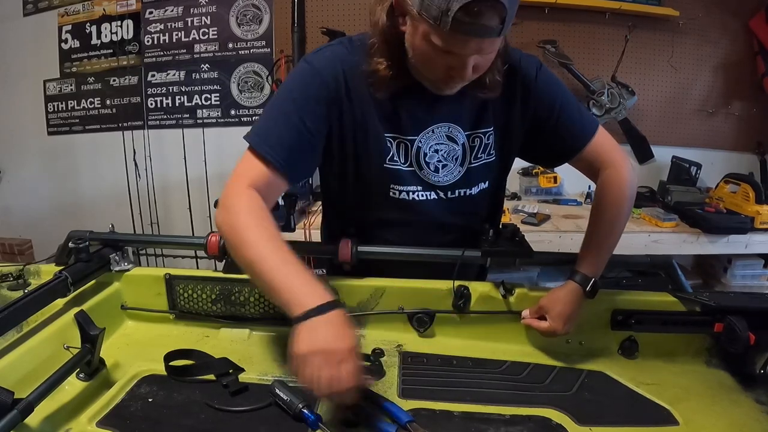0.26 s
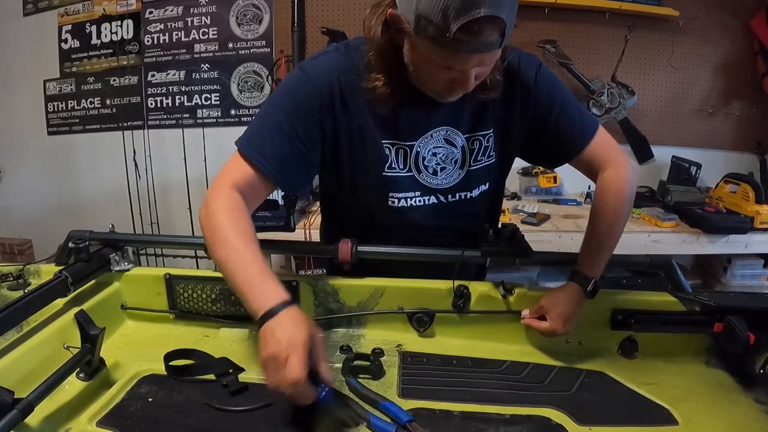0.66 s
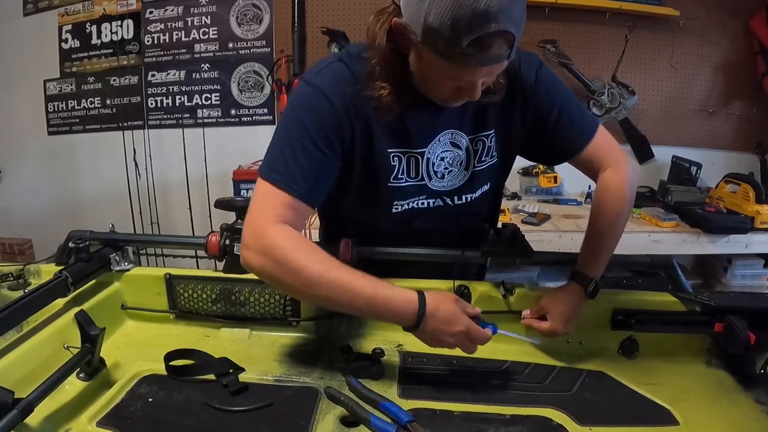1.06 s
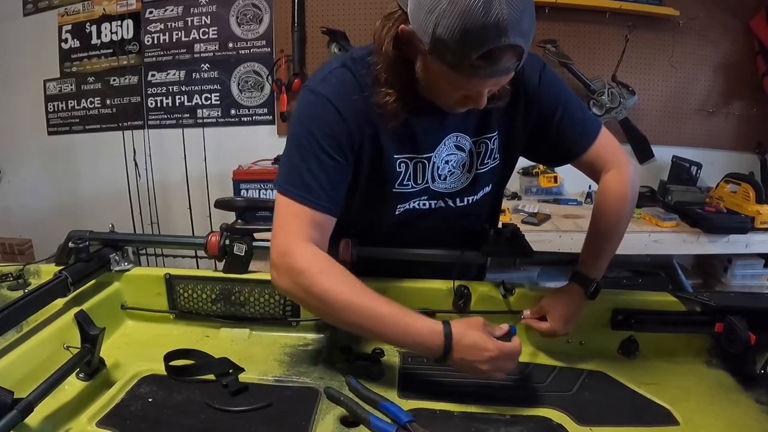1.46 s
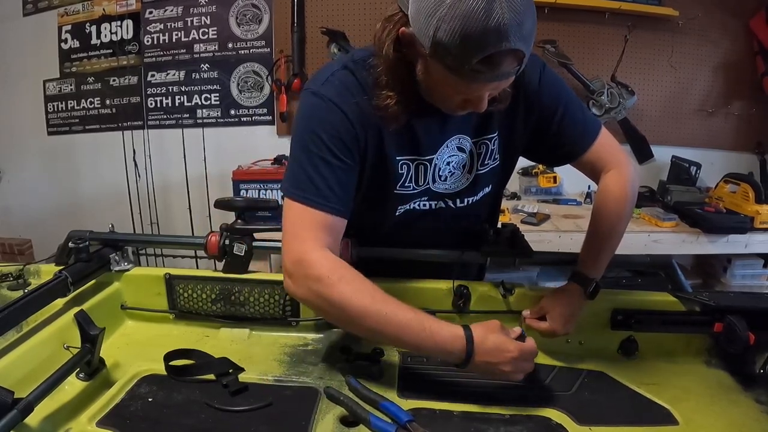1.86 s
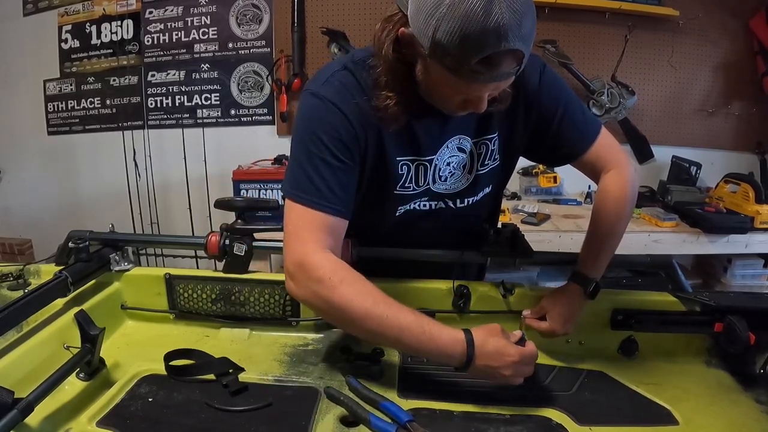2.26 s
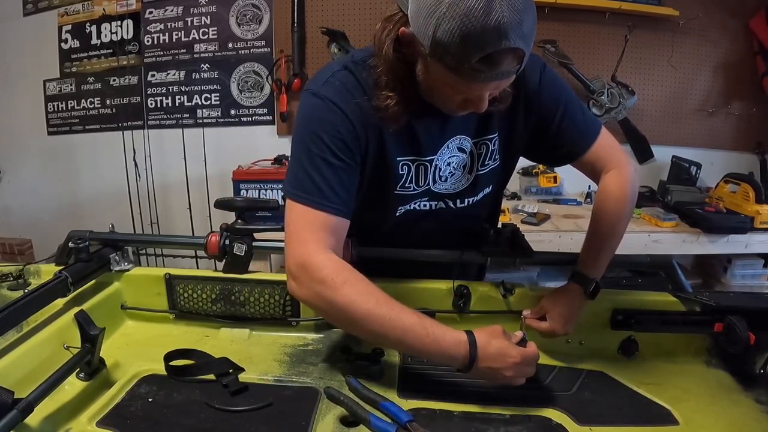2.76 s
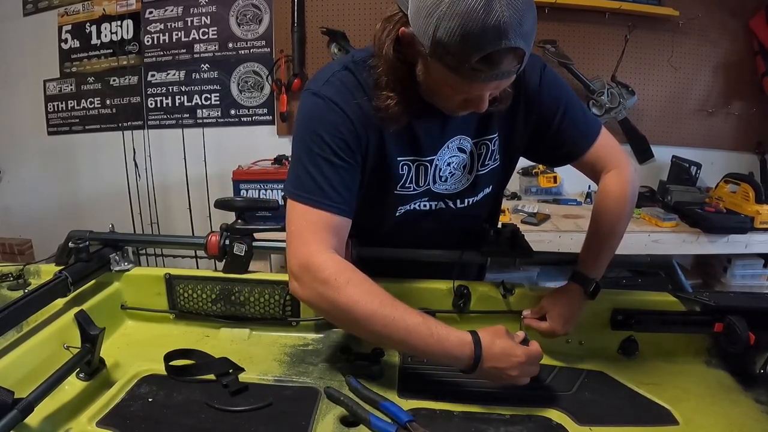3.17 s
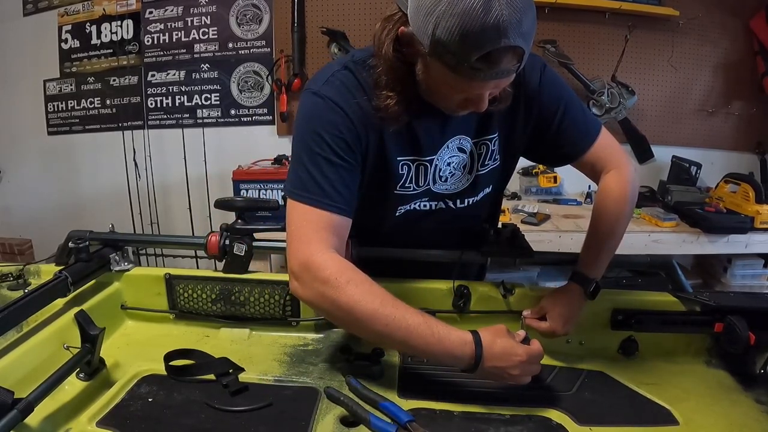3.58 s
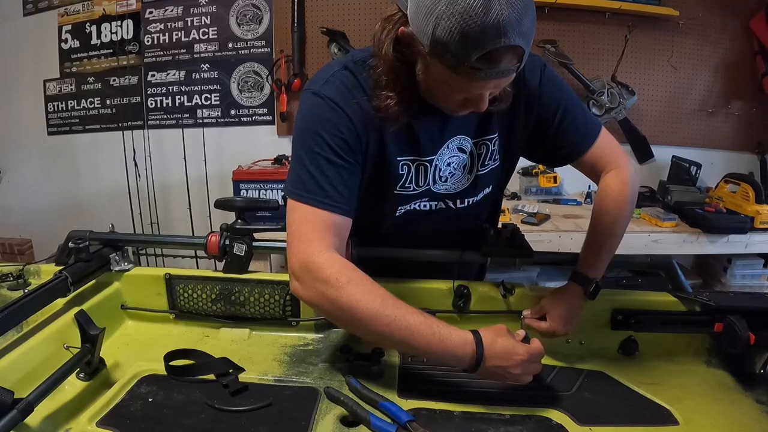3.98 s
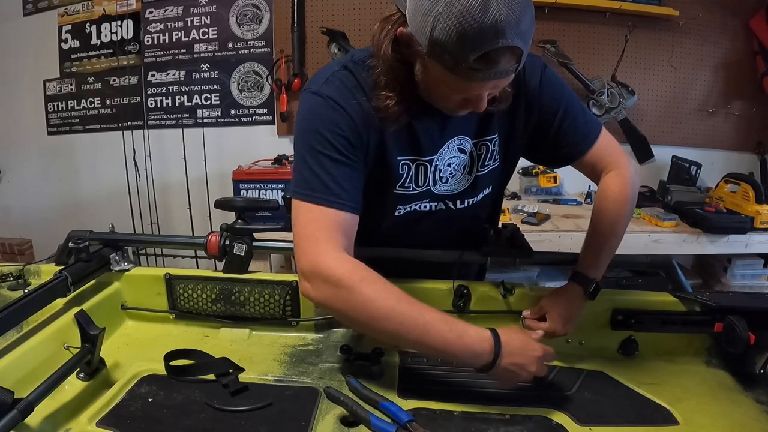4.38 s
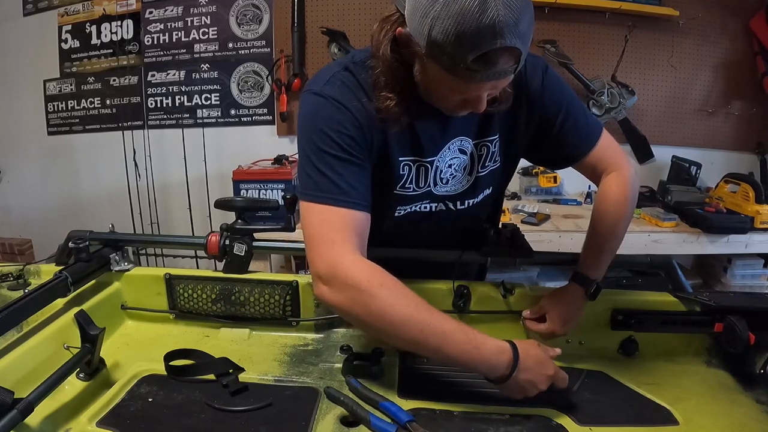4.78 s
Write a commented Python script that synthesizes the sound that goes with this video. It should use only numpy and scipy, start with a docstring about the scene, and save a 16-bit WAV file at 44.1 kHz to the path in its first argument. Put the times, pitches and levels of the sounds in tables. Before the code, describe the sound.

Quiet handling and faint sliding on a hollow plastic hull, then sharp plastic knocks, one strong locking snap, and soft bumps afterwards.

```python
"""In a garage, close to a hollow plastic kayak hull: a hard clack dies away as loose tools tick,
over faint rumble, drone and room air. Hands bump the hull and slide along a screwdriver picked up from the deck.
From 2.7 s a plastic clamp slips and snaps on its seat; one snap at 4.4 s locks the jaws, then bumps and strokes follow.
Contacts are struck modes of clamp and hull with bursts of noise for the edges; sliding is grainy noise.
The garage answers with a convolved echo and scattered noise that fades band by band."""
import sys
import numpy as np
from scipy import signal
from scipy.fft import rfft, irfft, next_fast_len
from scipy.io import wavfile
from scipy.ndimage import uniform_filter1d

SR = 44100
rng = np.random.default_rng(int(sys.argv[2]) if len(sys.argv) > 2 else 0)


def master_out(mix):
    """Clip the mix to full scale and print it as 16-bit PCM to the path in sys.argv[1]."""
    frames = np.transpose(np.atleast_2d(mix))
    ceiling = np.clip(frames, -1, 1)
    pcm = np.round(ceiling * 32767).astype(np.int16)
    wavfile.write(sys.argv[1], SR, pcm)


N = 221772
TIME = np.arange(N) / SR

# echo colour of the garage: pitch_hz, level_db
ECHO_COLOUR = [(60, 4.5), (150, -4), (300, -6), (600, -3), (1200, -4.5), (3000, -7.5), (6000, -4),
               (12000, -8.5)]
# how long the garage rings: pitch_hz, t60_s
ECHO_DECAY = [(80, 0.11), (260, 0.56), (700, 0.47), (1300, 0.61), (4000, 0.56), (7000, 0.67), (12000, 0.48)]
# likeness of left and right in the faint background: pitch_hz, likeness (0-1)
BACKGROUND_LIKENESS = [(40, 1), (110, 0.9), (200, 0.54), (360, 0.06), (2200, 0.11), (4000, 0.4),
                       (7000, 0.6), (13000, 0)]
# modes of the clamp on its seat: pitch_hz, level_db, t60_s
CLAMP_MODES = [(498, -5, 0.012), (706, -3.5, 0.017), (745, -12, 0.023), (1001, -10, 0.0096),
               (1101, 1.5, 0.0094), (1146, -1.5, 0.0042), (1240, -5.5, 0.007), (1620, -11.5, 0.0081),
               (2110, -4, 0.0034), (3490, -3, 0.025)]


def from_db(db):
    """Decibels to gain."""
    return 10 ** (np.asarray(db) / 20)


def rms_one(x):
    """Scale to unit rms."""
    return x / np.sqrt(np.mean(x ** 2) + 1e-20)


def at_hz(points, hz):
    """Read a curve on a log-frequency axis."""
    point_hz, value = np.array(points).T
    return np.interp(np.log(hz), np.log(point_hz), value)


def butter(x, order, hz, kind="low"):
    """Butterworth filter."""
    return signal.sosfilt(signal.butter(order, hz, kind, fs=SR, output="sos"), x)


def noise(colour, size=N, likeness=None):
    """Coloured noise at two close microphone ports, alike by a given share at each pitch."""
    # likeness of left and right unless another is given: pitch_hz, likeness (0-1)
    usual_likeness = [(40, 0.4), (120, 0.82), (260, 0.97), (550, 0.78), (1100, 0.71), (2500, 0.61),
                      (6000, 0.9), (12000, 0.34)]
    if likeness is None:
        likeness = usual_likeness
    padded = next_fast_len(size)
    hz = np.maximum(np.fft.rfftfreq(padded, 1 / SR), 1)
    mid, side = rfft(rng.standard_normal((2, padded)))
    alike = np.clip(at_hz(likeness, hz), 0, 1)
    common = np.sqrt((1 + alike) / 2) * mid
    opposite = np.sqrt((1 - alike) / 2) * side * [[1], [-1]]
    return irfft((common + opposite) * from_db(at_hz(colour, hz)), padded)[:, :size]


def dying(x, stretch=1):
    """Overlapping bands half an octave apart each die away at the garage's own rate, stretched."""
    size = x.shape[1]
    octave = np.log2(np.maximum(np.fft.rfftfreq(size, 1 / SR), 1))
    spectrum, out = rfft(x), 0
    for centre in np.arange(5, 14.6, .5):
        band = irfft(spectrum * np.maximum(0, 1 - 2 * abs(octave - centre)), size)
        t60 = stretch * at_hz(ECHO_DECAY, 2 ** centre)
        out = out + band * from_db(-60 * TIME[:size] / t60)
    return out


def blows(times, levels_db):
    """A one-sample push at each time."""
    force = np.zeros(N)
    np.add.at(force, np.round(times * SR).astype(int), from_db(levels_db))
    return force


def ring(force, hz, t60):
    """A mode as a two-pole resonator: a unit click sets a sine of height 1 ringing."""
    radius = from_db(-60 / (t60 * SR))
    angle = 2 * np.pi * hz / SR
    # the tiny offset keeps the filter clear of denormal numbers
    return signal.lfilter([0, np.sin(angle)], [1, -2 * radius * np.cos(angle), radius ** 2], force + 1e-18)


def dullness(hz, hardness_hz):
    """Loss in dB at a pitch above what a contact of this hardness can reach."""
    return 10 * np.log10(1 + (hz / hardness_hz) ** 4)


def opening_clack(level_db, stretch, pan_db):
    """The garage still rings from a hard clack on the left: dying noise and its strongest tones."""
    # colour of the ringing garage: pitch_hz, relative_db per Hz
    ring_colour = [(47, -44), (80, 1.5), (118, -8), (206, -22.5), (256, -14), (687, -14), (749, -9.5),
                   (1150, -2), (1590, -15.5), (2060, -19), (2340, -24), (2950, -27), (3400, -20.5),
                   (4100, -25), (4750, -33.5), (5600, -28), (7800, -31), (13600, -48.5)]
    # strongest tones: pitch_hz, level_db, t60_s
    tone_modes = [(762, -44.5, 0.28), (905, -44, 0.38), (1234, -41.5, 0.69), (1350, -49, 0.68)]
    tail = from_db(level_db) * dying(rms_one(noise(ring_colour, size=SR)), stretch)
    tail = np.pad(tail, [(0, 0), (0, N - SR)])
    tones = sum(ring(blows(np.zeros(1), db), hz, t60) for hz, db, t60 in tone_modes)
    return from_db(pan_db * np.array([[.5], [-.5]])) * (tail + tones)


def leaning():
    """Arms shifting their weight swell a faint rumble of the hollow hull, over a soft drone."""
    # rumble of the hull under the arms: pitch_hz, relative_db per Hz
    rumble_colour = [(20, -10.5), (28, 3.5), (38, -2.5), (52, 1.5), (75, -8), (115, -6.5), (250, -35.5),
                     (600, -75)]
    # likeness of left and right in the rumble: pitch_hz, likeness (0-1)
    rumble_likeness = [(40, 0.9), (150, 0.9)]
    # shifts of weight: heaviest_s, half_length_s, rise_db
    shifts = [(0.675, 0.17, 17), (1.687, 0.23, 11), (1.997, 0.04, 8.5), (4.7, .2, 14.5)]
    # drone of the hollow hull: pitch_hz, relative_db per Hz
    drone_colour = [(70, -25.5), (120, -9.5), (172, 13.5), (215, -4), (300, -5.5), (420, -23), (900, -63)]
    # level of the drone: time_s, level_db
    drone_level = [(0.3, -69), (1.0, -62.5), (1.6, -63.5), (2.0, -63), (2.4, -58), (2.9, -61), (3.9, -61.5),
                   (4.6, -60), (5.03, -57)]
    resting_db = -65.5
    weight_db = sum(db * np.exp(-((TIME - s) / half) ** 2) for s, half, db in shifts)
    rumble = from_db(resting_db + weight_db) * rms_one(noise(rumble_colour, likeness=rumble_likeness))
    drone_db = np.interp(TIME, *np.transpose(drone_level))
    drone = from_db(drone_db) * rms_one(noise(drone_colour, likeness=BACKGROUND_LIKENESS))
    return rumble + drone


def still_air():
    """Faint steady hum and hiss of the room, as coloured noise."""
    # quiet air of the garage: pitch_hz, relative_db per Hz
    air_colour = [(120, -38), (200, -7.5), (275, -15.5), (334, -19.5), (371, -21.5), (567, -27),
                  (900, -32.5), (1070, -25), (2290, -39), (3890, -44), (5540, -39.5), (12300, -58.5),
                  (13600, -66)]
    level_db = -74.5  # counted above 500 Hz
    air = noise(air_colour, likeness=BACKGROUND_LIKENESS)
    return air * from_db(level_db) / butter(air, 4, 500, "high").std()


def crack(times, levels_db, tops_hz, lengths, peak_share, width):
    """Dense high modes burst as noise while an edge slips; softer contacts are duller."""
    # crack of the hard edges: pitch_hz, relative_db per Hz
    crack_colour = [(700, -13.5), (1400, 5.5), (2200, 3.5), (2800, -2), (3600, -1), (4700, -4.5),
                    (5800, -4.5), (7500, -7), (10000, -17), (14000, -14)]
    size = SR // 20
    out = np.zeros((2, N + size))
    grain = rms_one(noise(crack_colour))
    grain = width * grain + (1 - width) * grain.mean(axis=0)
    for s, db, top_hz, length in zip(times, levels_db, tops_hz, lengths):
        at = round(s * SR)
        age = TIME[:size] / (peak_share * length)
        burst = grain[:, at:at + size]
        age = age[:burst.shape[1]]
        swell = age * np.exp(1 - age)  # peaks at 1, then fades
        out[:, at:at + burst.shape[1]] += from_db(db) * butter(burst * swell, 2, top_hz)
    return out[:, :N]


def ticking(pan_db, edge_db):
    """Loose tools touch with a short ring and a thin crack, slightly louder on the right."""
    # ticks of the tools: start_s, level_db, hardness_hz
    ticks = [(.012, -43.5, 9000), (.029, -50, 9000), (0.335, -50, 4730), (0.622, -63, 10000),
             (0.721, -76, 11000)]
    # ring of a ticking tool: pitch_hz, level_db, t60_s
    tool_modes = [(2720, -12, 0.0073), (3490, 4, 0.0077), (4200, -12, 0.0091)]
    tick_s = 0.0021
    times, levels_db, hardness_hz = np.transpose(ticks)
    lengths = np.full(len(times), tick_s)
    edges = crack(times, levels_db + edge_db, hardness_hz, lengths, peak_share=0.22, width=0.96)
    rings = sum(ring(blows(times, levels_db + db), hz, t60) for hz, db, t60 in tool_modes)
    return (edges + rings) * from_db(pan_db * np.array([[.5], [-.5]]))


def rubbing(grain_db):
    """Skin and tool handle slide in small uneven catches, louder on the left; light strokes sound thinner."""
    # short strokes of fingers and screwdriver: start_s, length_s, peak_db
    strokes = [(0.612, 0.031, -71), (0.644, 0.035, -67.5), (0.677, 0.054, -59.5), (.85, 0.082, -83),
               (0.956, .18, -91), (1.195, .12, -81.5), (4.68, .04, -81), (4.785, 0.032, -77),
               (4.809, .13, -73.5), (4.99, 0.042, -84)]
    # hiss of sliding skin: pitch_hz, relative_db per Hz
    rub_colour = [(600, -31), (1400, 3.5), (2600, -6.5), (4000, -4.5), (6000, -5), (8500, -17),
                  (12000, -27), (15000, -18)]
    # thin hiss of a light touch: pitch_hz, relative_db per Hz
    brush_colour = [(3500, -22), (5500, -4.5), (7500, 5), (12500, -5), (15000, -20)]
    rise = 0.68  # share of a stroke spent swelling
    brush_db, brush_follows = -70, 0.62  # at the firmest stroke; share of each stroke's swing in dB
    pressure = 0
    for s, length, db in strokes:
        swell = np.interp(TIME, [s, s + rise * length, s + length], [0, 1, 0])
        pressure = pressure + from_db(db) * swell
    catches = rms_one(uniform_filter1d(rng.standard_normal(N), size=130))
    rub = pressure * rms_one(noise(rub_colour) * from_db(grain_db * catches))
    touch = (pressure / pressure.max()) ** brush_follows
    brush = from_db(brush_db) * touch * rms_one(noise(brush_colour))
    return (rub + brush) * from_db([[2], [-2]])


def hull(times, levels_db, hardness_hz, modes, lag, low_hz, soft_hz, vary_db):
    """The heavy shell follows each contact late and softly; every blow favours other modes."""
    out = 0
    for hz, db, t60 in modes:
        strength = levels_db + db - dullness(hz, hardness_hz) + vary_db * rng.standard_normal(len(times))
        out = out + ring(blows(times + lag, strength), hz, t60)
    return butter(out, 2, [low_hz, soft_hz], "band")


def rocking(bending, level_db, top_hz):
    """The deepest bending rocks the microphone, pushing its two ports opposite ways."""
    return from_db(level_db) * butter(bending, 2, top_hz) * np.array([[1], [-1]])


def boom(times, flex_db, wall_db, hardness_hz):
    """The hull bends as a whole and its panels ring."""
    # slow bending of the whole hull: pitch_hz, level_db, t60_s
    flex_modes = [(68, -18, 0.6), (116.8, -5.5, 0.25), (149.5, -2, 0.23), (183, -9, 0.024)]
    # panels of the hull around the clamp: pitch_hz, level_db, t60_s
    wall_modes = [(208.2, -9, 0.11), (240.9, -2, 0.12), (270.5, -5, .14), (283.8, -13, 0.2),
                  (385, -27, 0.051), (424.6, -9.5, 0.049), (455, -14.5, 0.031)]
    bending = hull(times, flex_db, hardness_hz, flex_modes, lag=0.0015, low_hz=70, soft_hz=292, vary_db=4.0)
    panels = hull(times, wall_db, hardness_hz, wall_modes, lag=0.0013, low_hz=171.6, soft_hz=686, vary_db=1.5)
    return bending + rocking(bending, level_db=-3.5, top_hz=99) + panels


def clamp(force, modes, soft_hz):
    """Short, stiff modes; the contact rounds off the top and so small a part radiates little bass."""
    out = sum(from_db(db) * ring(force, hz, t60) for hz, db, t60 in modes)
    return butter(butter(out, 2, soft_hz), 3, 520, "high")


def thumping():
    """Hands and the seated clamp bump the hull; softer contacts stir its panels and the clamp less."""
    # bumps on the hull: start_s, strength_db, hardness_hz
    thumps = [(0.622, -48.5, 300), (0.639, -36, 120), (0.673, -32, 94), (0.714, -42.5, 240),
              (1.771, -44.5, 620), (3.9911, -38, 580), (4.4343, -20, 148), (4.4735, -36.5, 200),
              (4.512, -27, 110), (4.698, -46.5, 230), (4.797, -30, 100), (4.875, -43, 140)]
    clamp_hz = 1020  # the pitch a bump must reach to stir the clamp
    times, strength_db, hardness_hz = np.transpose(thumps)
    push = blows(times, strength_db - dullness(clamp_hz, hardness_hz))
    rattle = clamp(push, CLAMP_MODES, soft_hz=1220)
    return boom(times, strength_db, strength_db, hardness_hz) + rattle


def slips(times, levels_db, lengths, slip_db, spread_db, count=5):
    """A first catch, then weaker ones either way as the plastic slides home."""
    draws = rng.random((len(times), 3, count))
    later = times[:, None] + lengths[:, None] * (np.arange(count) + draws[:, 0]) / count
    later_db = levels_db[:, None] + slip_db - 6 * draws[:, 1]
    # slips over twice the shortest start more gently
    first_db = levels_db - spread_db * np.log2(np.maximum(lengths / lengths.min() / 2, 1))
    forward = draws[:, 2] < .5
    first = blows(times, first_db)
    return first + blows(later[forward], later_db[forward]) - blows(later[~forward], later_db[~forward])


def snapping():
    """Each snap rings the clamp, booms the hull and cracks at the edges; one also locks the jaws."""
    # slips and snaps on the seat: start_s, strength_db, push_db into the hull, hardness_hz, slip_length_s
    snaps = [ (2.651, -63, -73, 3000, 0.00604), (2.852, -52.5, -51.5, 4030, .005),
             (2.8641, -28, -24.5, 5660, 0.0028), (2.987, -40.5, -38.5, 2880, .005),
             (3.091, -46.5, -42.5, 2940, 0.0055), (3.204, -43.5, -51, 3980, 0.0082),
             (3.216, -42.5, -44.5, 4500, 0.0092), (3.249, -38.5, -35, 4670, .0045),
             (3.29, -37, -44, 5850, 0.01), (3.350, -30, -31, 6300, 0.00321),
             (3.435, -41.5, -52, 5900, 0.008), (3.45, -36, -42, 4200, 0.0065),
             (3.5454, -21.5, -23.5, 7000, .0034), (3.723, -42.5, -52, 4500, 0.006),
             (3.73, -41, -42, 4470, 0.0085), (3.755, -42, -35, 4300, .0035),
             (4.044, -39, -57, 3900, 0.0081), (4.0546, -31, -34, 13500, .0028),
             (4.205, -30, -34, 3300, 0.012), (4.211, -39, -25.5, 3900, .007),
             (4.2358, -32, -27.5, 4440, .0037), (4.416, -31, -34.5, 3800, 0.011),
             (4.4332, -25, -27.5, 4200, .003), (4.878, -55.5, -55, 4460, 0.0094)]
    # the locked jaws ring higher: pitch_hz, level_db, t60_s
    jaw_modes = [(616, -2.5, 0.059), (1914, 0, 0.021), (2180, -5.5, 0.01), (2476, -5.5, 0.02),
                 (2730, -8.5, 0.017), (3000, -13, 0.016), (3900, -12.5, 0.013), (4500, -17, 0.012)]
    lock_s, lock_db = 4.4337, -28.5
    clamp_db = -2.5  # against the strength of the snap
    quick_slip_s, crack_db, crack_loss_db = 0.0028, -6, 5  # loss per doubling of slip length
    # bending: level at the hardest push, dB per dB of push, loss per doubling of slip length
    flex_max_db, flex_growth, flex_loss_db = -26.5, 1, 10
    times, strength_db, push_db, hardness_hz, lengths = np.transpose(snaps)
    slowness = np.log2(lengths / quick_slip_s)
    flex_db = flex_max_db + flex_growth * (push_db - push_db.max()) - flex_loss_db * slowness
    force = slips(times, strength_db + clamp_db, lengths, slip_db=-5.5, spread_db=10)
    clack = clamp(force, CLAMP_MODES, soft_hz=1474)
    lock = clamp(blows(np.array([lock_s]), lock_db), jaw_modes, soft_hz=7150)
    edge_db = strength_db + crack_db - crack_loss_db * slowness
    edges = crack(times, edge_db, hardness_hz, lengths, peak_share=0.33, width=0.63)
    return boom(times, flex_db, push_db, hardness_hz) + clack + lock + edges


def from_right(x, pan_db):
    """The work lies a little to the right: the left port hears it one sample later and softer."""
    left, right = np.broadcast_to(x, (2, N))
    return np.array([np.append(0, left[:-1]) * from_db(pan_db / 2), right * from_db(-pan_db / 2)])


def garage(x, build_s, early_db, early_s, early_hz):
    """Short waves first bounce about inside the hull; then the garage's echoes thicken and fade."""
    t = TIME[:SR]
    late = dying(noise(ECHO_COLOUR, size=SR))
    early = butter(noise(ECHO_COLOUR, size=SR), 2, early_hz, "high")
    early = from_db(early_db) * early * np.exp(-t / early_s)
    response = (late + early) * (1 - np.exp(-t / build_s))
    return signal.fftconvolve(x, response / np.sqrt(.033 * SR), axes=1)[:, :N]


def diffuse(x):
    """Clutter scatters each band's energy into a smooth field that fades at the garage's own rate."""
    out = 0
    edges = 56 * 2 ** (np.arange(25) / 3)  # third-octave bands
    flat = [(20, 0), (20000, 0)]
    fields = [noise(flat) for _ in range(2)]  # neighbouring bands take turns
    for k, (low, high) in enumerate(zip(edges, edges[1:])):
        hz = np.sqrt(low * high)
        keep = from_db(-60 / (at_hz(ECHO_DECAY, hz) * SR)) ** 2
        power = butter(x.mean(axis=0), 2, [low, high], "band") ** 2
        energy = signal.lfilter([1 - keep], [1, -keep], power)
        field = rms_one(butter(fields[k % 2], 2, [low, high], "band"))
        out = out + from_db(at_hz(ECHO_COLOUR, hz)) * np.sqrt(energy) * field
    return out


def scene():
    """Contacts and handling with their echo in the garage, over its quiet air."""
    work = from_right(snapping() + thumping(), pan_db=-0.9)
    direct = work + ticking(pan_db=-0.5, edge_db=3) + rubbing(grain_db=-2.0)
    reflections = garage(direct, build_s=0.0003, early_db=13.5, early_s=0.0093, early_hz=720)
    echo = from_db(-3.5) * reflections + from_db(-0.5) * diffuse(direct)
    background = leaning() + still_air()
    return direct + echo + opening_clack(level_db=-32.0, stretch=1.1, pan_db=2.0) + background


def record(dry):
    """A steep low-pass cuts the top."""
    cutoff_hz = 13400
    return signal.sosfilt(signal.ellip(8, .2, 70, cutoff_hz, fs=SR, output="sos"), dry)


dry = scene()
out = record(dry)
master_out(out)
```